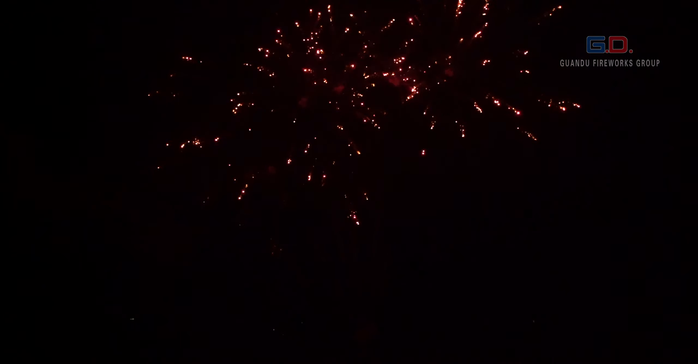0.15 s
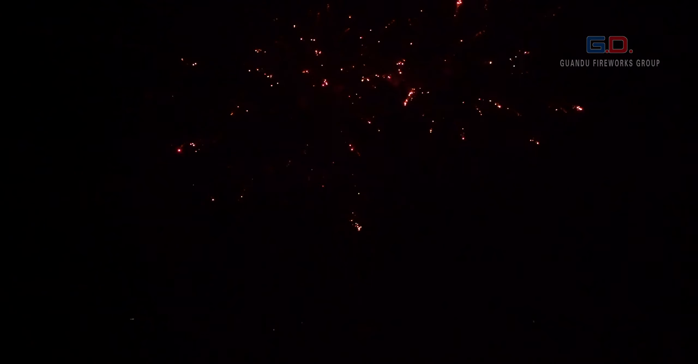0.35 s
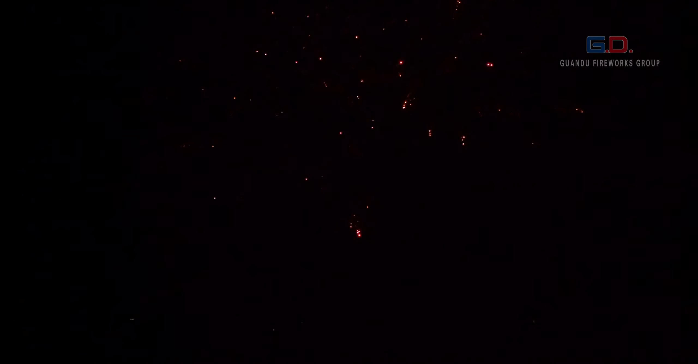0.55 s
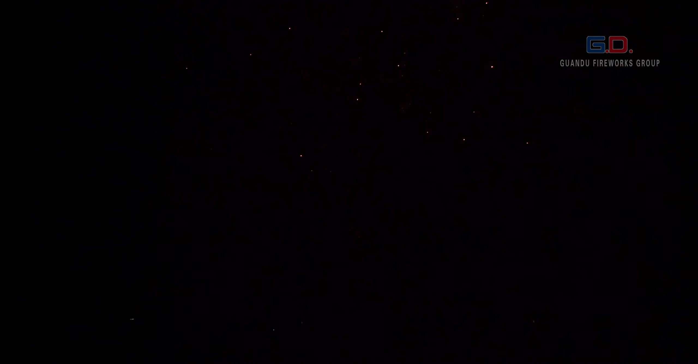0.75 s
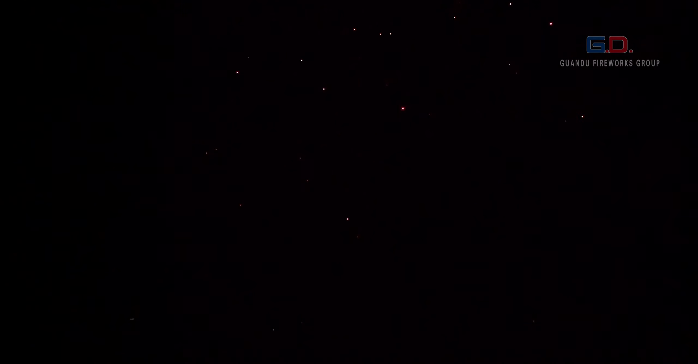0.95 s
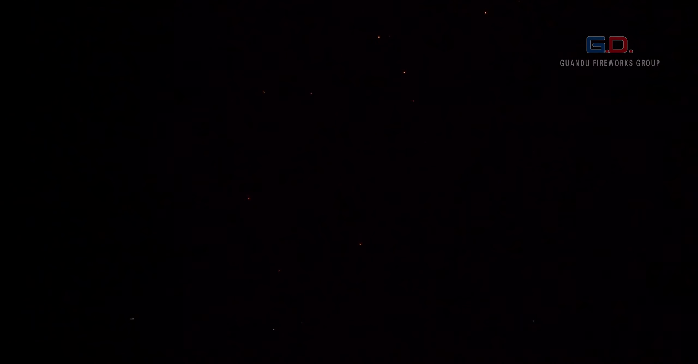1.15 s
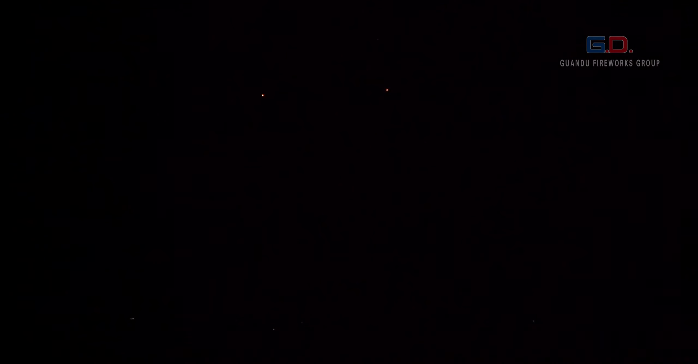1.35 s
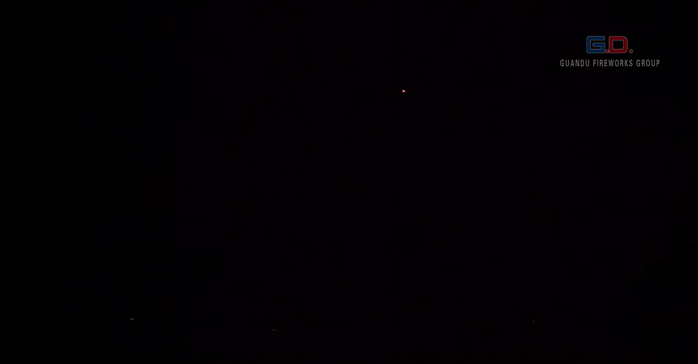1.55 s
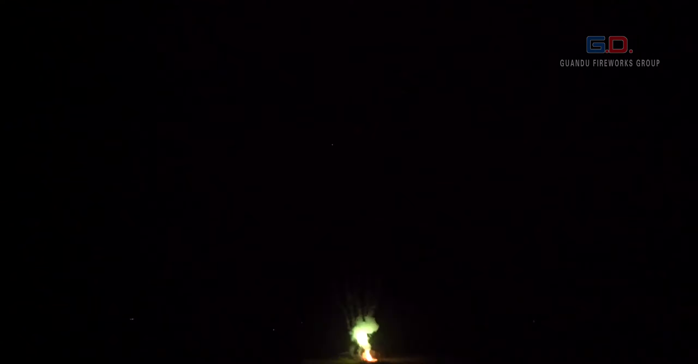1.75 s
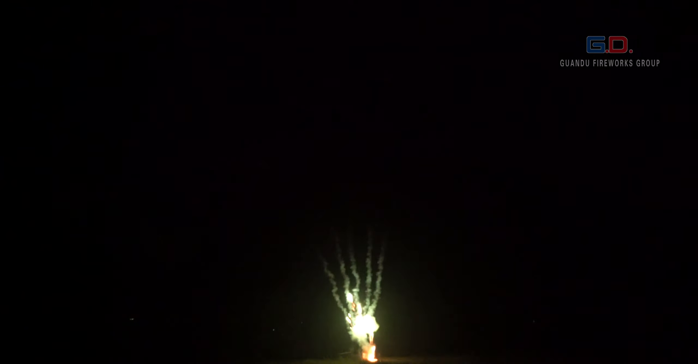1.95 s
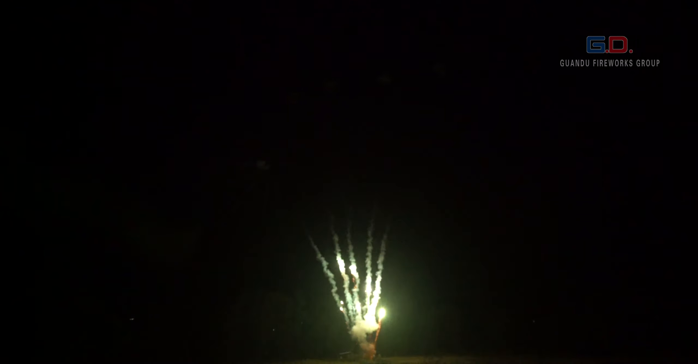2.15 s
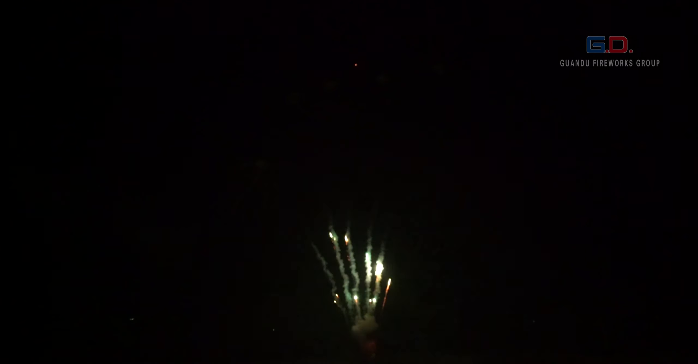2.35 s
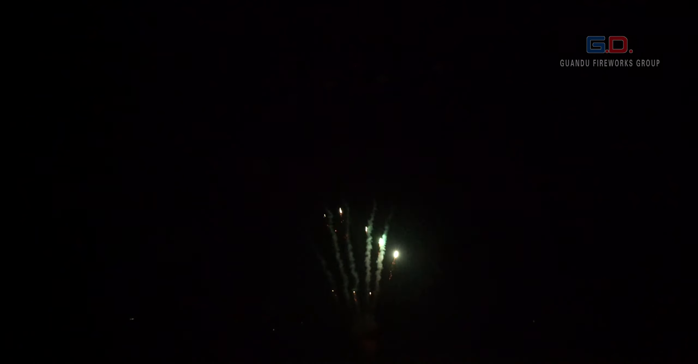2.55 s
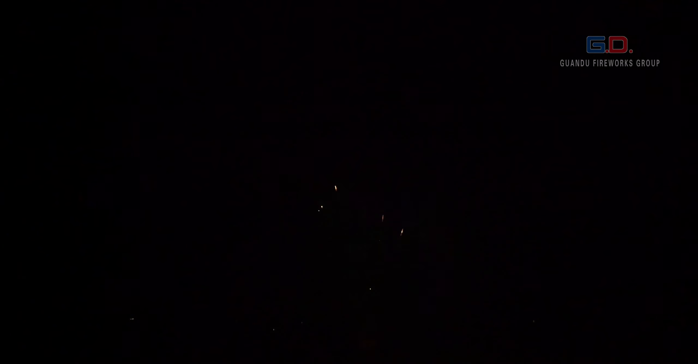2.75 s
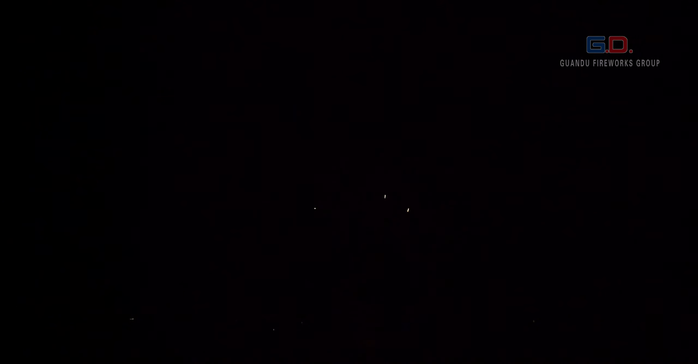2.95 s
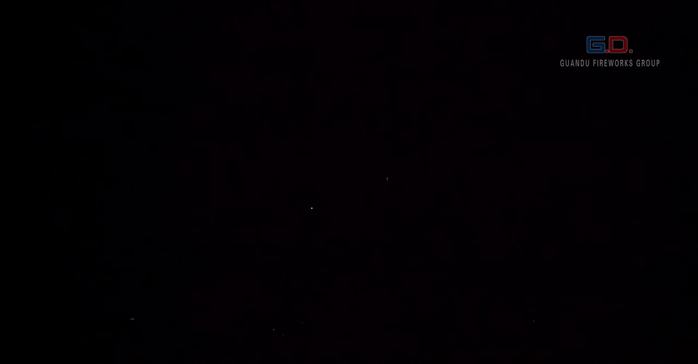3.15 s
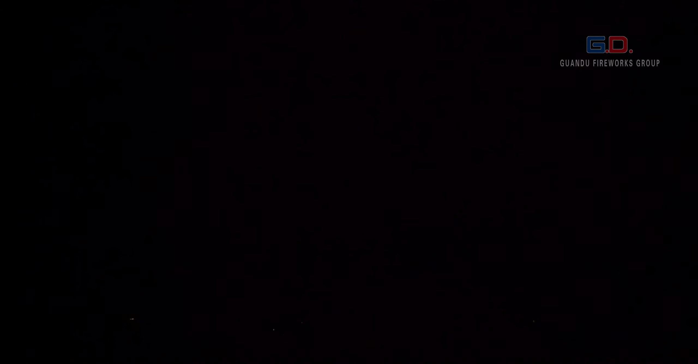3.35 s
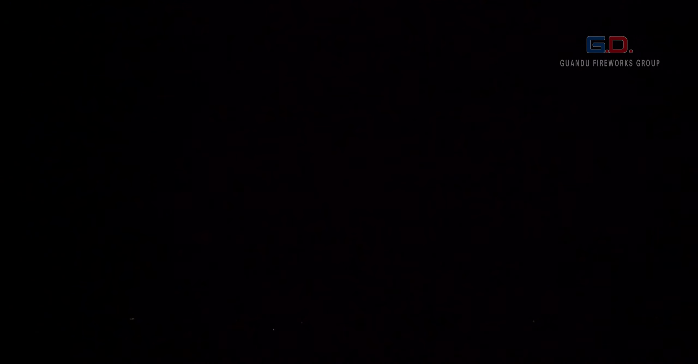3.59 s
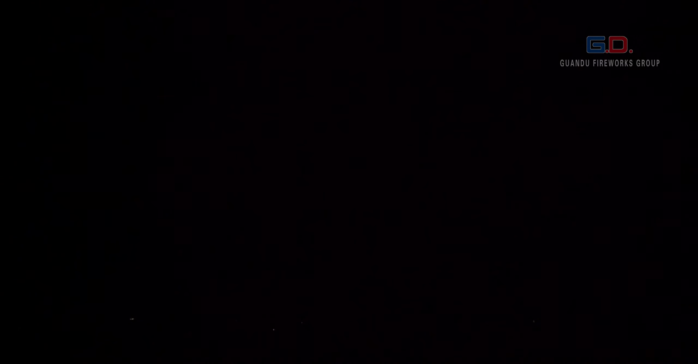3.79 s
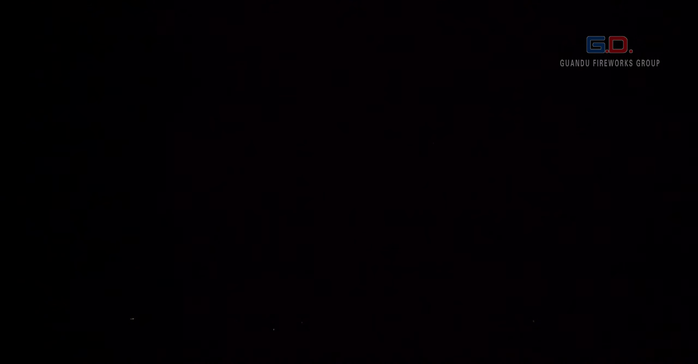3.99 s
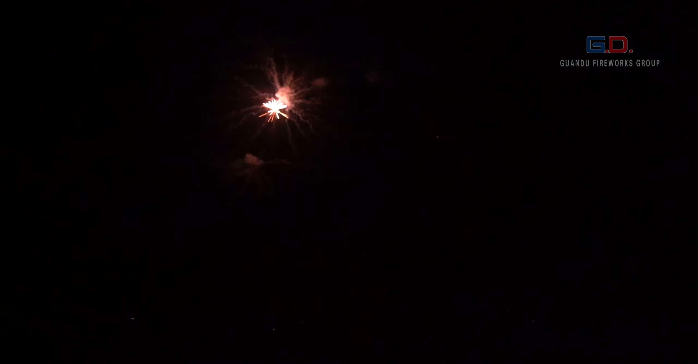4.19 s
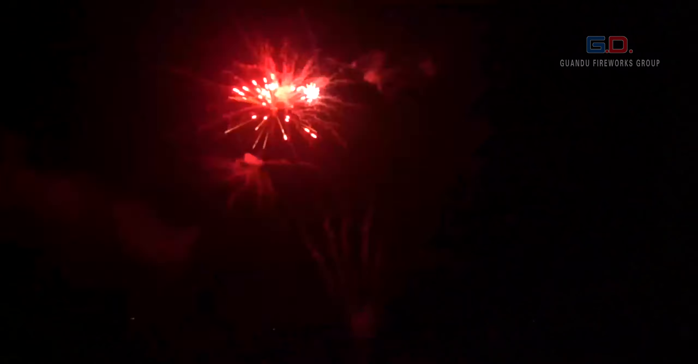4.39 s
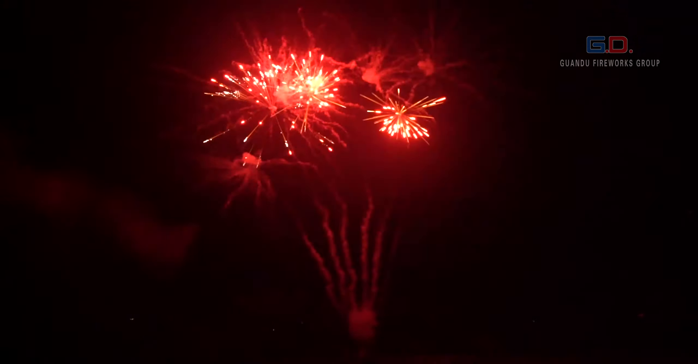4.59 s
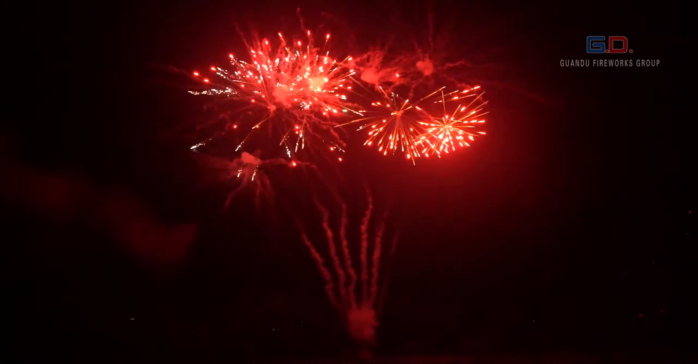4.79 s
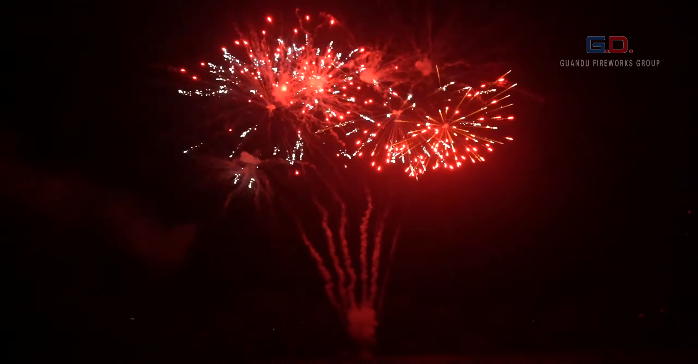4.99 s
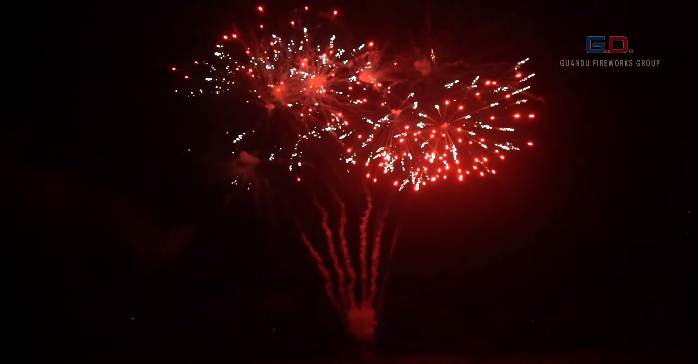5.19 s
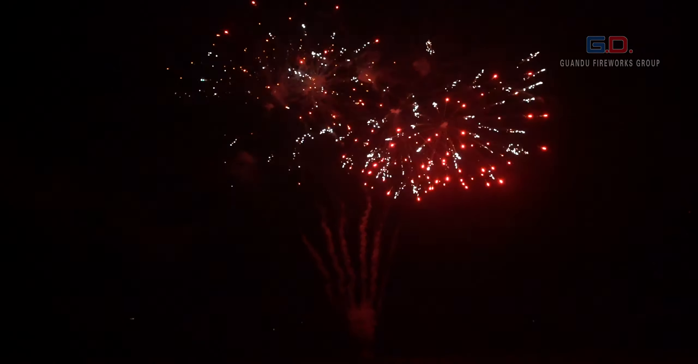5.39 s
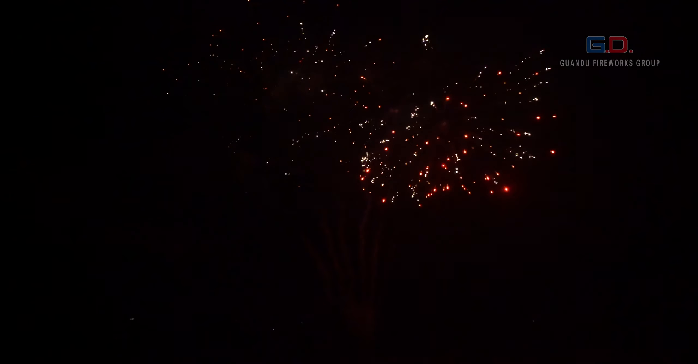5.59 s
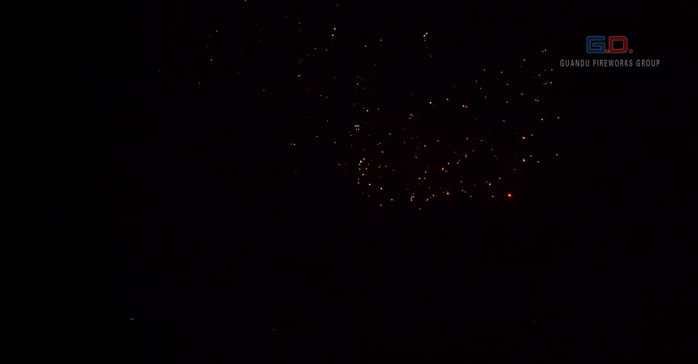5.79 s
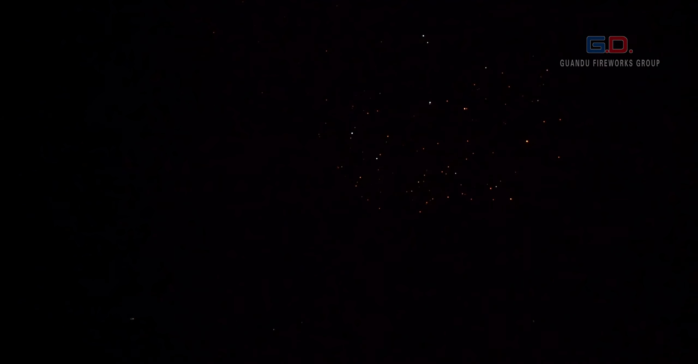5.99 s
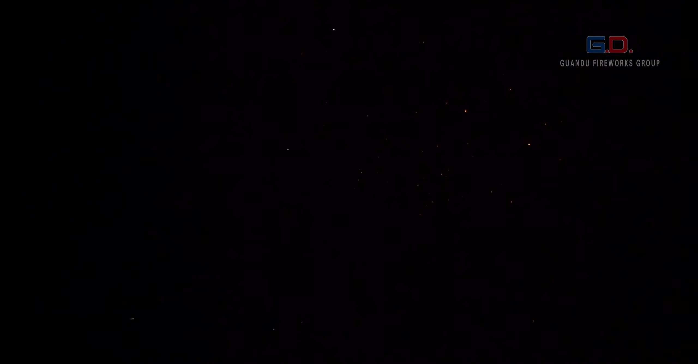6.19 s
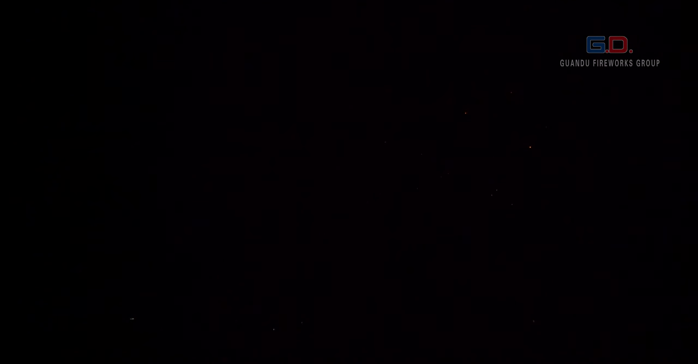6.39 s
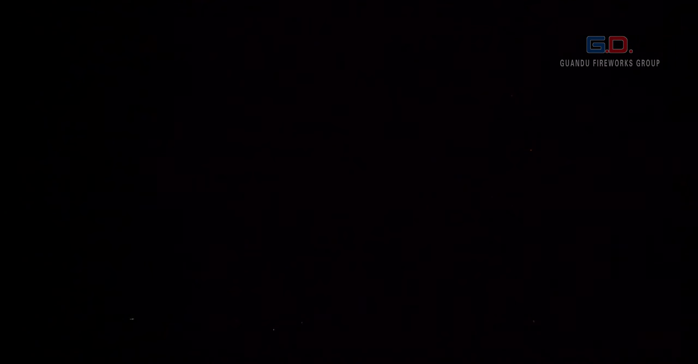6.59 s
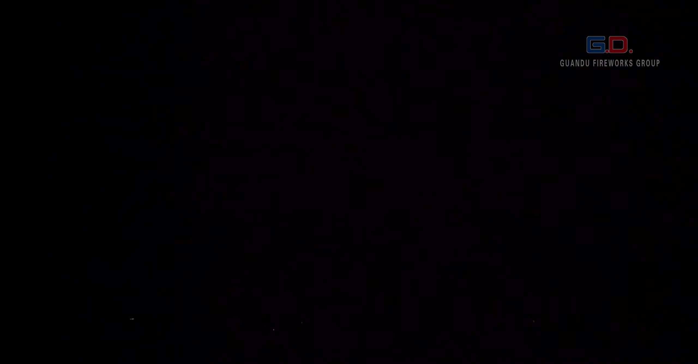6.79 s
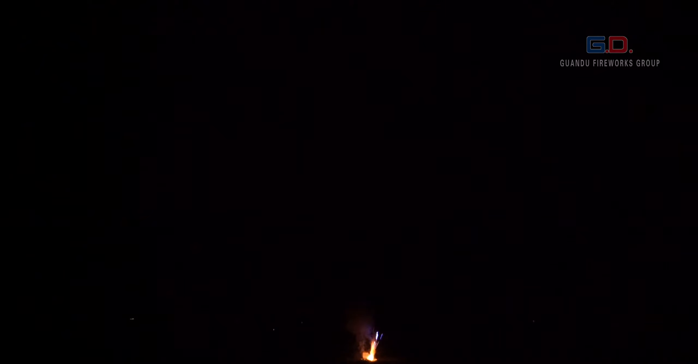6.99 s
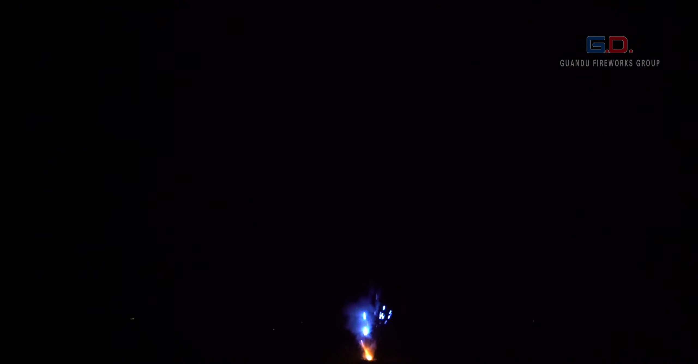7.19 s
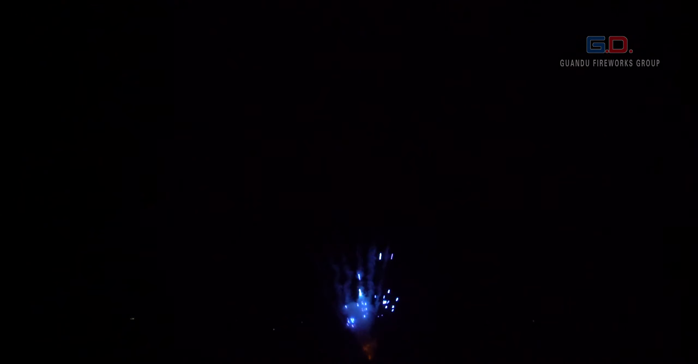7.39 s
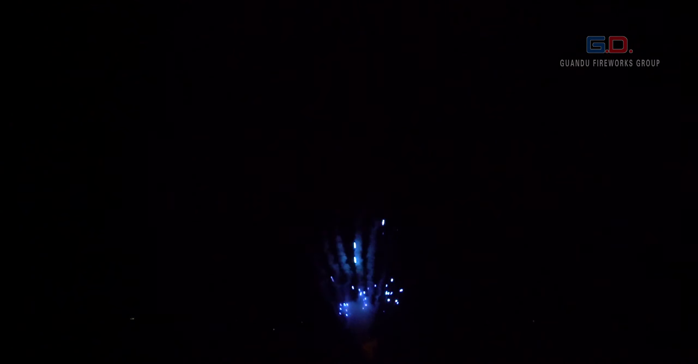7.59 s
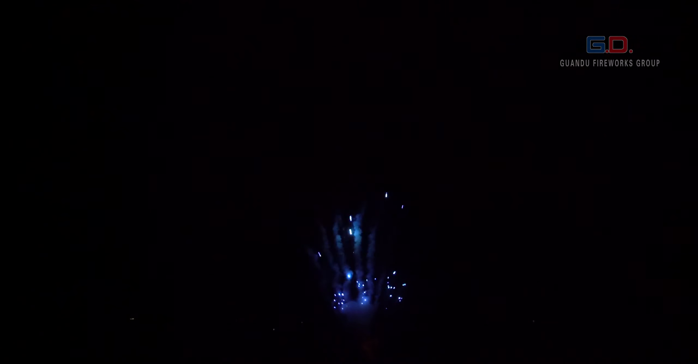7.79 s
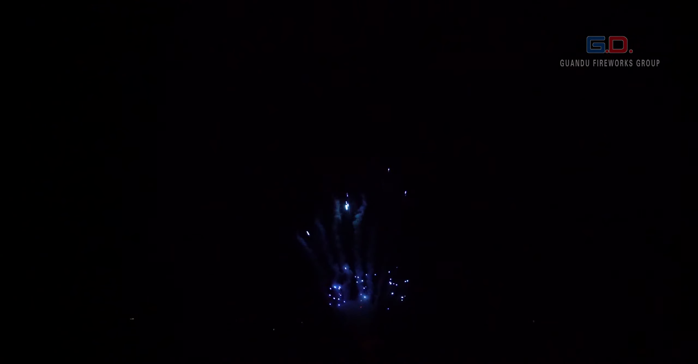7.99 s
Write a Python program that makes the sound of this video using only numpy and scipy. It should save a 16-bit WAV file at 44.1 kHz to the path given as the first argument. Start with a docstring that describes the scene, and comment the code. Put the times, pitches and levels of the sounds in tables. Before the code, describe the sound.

Heard from the edge of an open field, a fireworks cake launches two quick volleys of five cracking, hollow shots. Between the volleys, four shells explode overhead in a tight cluster, the loudest moment, leaving a long rumbling echo. A fading roll and soft sizzle open the scene, and dull faraway fireworks thud before each volley. Very faint crickets and low night air fill the gaps.

```python
"""First the dying roll and sizzle of a shell already open over a night field, with far fireworks
rumbling and thudding and insects singing in the grass. A fireworks cake fires two fans of five shells,
each with a gas jet, a crack and a hollow tube note; between the fans four shells burst overhead.
Nearby walls slap back, the tree line rolls on, and a limiter flattens the bursts."""
import sys
import numpy as np
from scipy import signal
from scipy.fft import rfft, irfft, next_fast_len
from scipy.io import wavfile
from scipy.ndimage import uniform_filter1d, minimum_filter1d, map_coordinates

SR = 44100
rng = np.random.default_rng(int(sys.argv[2]) if len(sys.argv) > 2 else 0)


def file_out(sig):
    """Save sig as 16-bit WAV at sys.argv[1]."""
    # one column per channel
    cols = np.atleast_2d(sig).T
    # limit, then scale
    lim = np.clip(cols, -1, 1)
    pcm = np.round(lim * 32767).astype(np.int16)
    wavfile.write(sys.argv[1], SR, pcm)


N = 355005

# Event levels are relative; each layer adds its own offset.
# overhead shells: start_s, crack_db, roll_db, roll_rise_s, near_scatter_db, far_rumble_db
SHELL_BURSTS = [(-.68, 0, 0, .02, 0, -32.5), (4.5799, 2.5, .3, .016, 2, -42.5),
                (4.7895, 3.5, -1.2, .05, 0.5, -42.5), (4.8533, -4, -12, .02, -9, -42.5),
                (5.0525, 0, -5.8, .012, 3.5, -41.5)]
# cricket: start_s, chirp_count, period_s, level_after_burst_db
CRICKET_BOUTS = [(.45, 3, .338, -62.3), (2.378, 7, .323, -62.5), (5.885, 5, .31, -63)]
# far fireworks: start_s, thud_db, crack_db
FAR_THUDS = [(.636, -37.5, -66), (.715, -32, -48), (.807, -45, -48), (0.882, -36, -49), (.979, -39, -52),
             (1.188, -25, -41), (6.527, -34, -52), (6.609, -31, -43.5), (6.727, -34, -53),
             (6.813, -26.5, -40.5)]
# lift charges: start_s, level_db, thump_db, jet_db, tube_pitch_hz
LIFT_CHARGES = [(2.0673, 2, -0.5, -3.5, 3520), (2.1401, 0, 3, 0, 3600), (2.2018, -1, 1.5, -3, 3250),
                (2.2474, -3.5, 11, -6, 900), (2.3086, -0.5, 0, -8, 1450), (7.292, 2.5, -0.5, -0.5, 2500),
                (7.3462, -0.5, -4, 0, 1500), (7.406, -0.5, 1, -1, 3400), (7.4655, -0.5, -4.5, -1, 2850),
                (7.5205, 2, -11, -2, 3020)]
# wall echoes: delay_s, gain, lowpass_hz
BURST_ECHOES = [(.0082, 0.44, 7000), (0.0115, 0.11, 5000), (0.013, 0.33, 5000), (0.028, -0.45, 900),
                (.046, .55, 2000), (.057, 0.51, 1190)]
LIFT_ECHOES = [(.0069, 0.71, 3000), (.0079, -0.11, 3500), (0.0187, -1.2, 280), (0.0195, .5, 400),
               (.029, -0.61, 300)]
# ring of the tubes and the walled yard: pitch_hz, level_db, t60_s
YARD_MODES = [(64.2, -14, 1.83), (115.1, 3.5, 0.58), (135.5, -5, 0.32), (182.3, 2, 0.44), (259.3, 0, 0.57),
              (294, 6, 0.18), (364, 1, 0.33), (898, -6, .12), (1135, -4, .15), (1432, -12, 0.11),
              (1903, -11, 0.28), (2170, -13, 0.19), (2960, -9.5, 0.13)]
# spectra: freq_hz, density_db
BURST_SPECTRUM = [(20, -38), (48, -25), (110, -1.5), (170, 0), (250, -0.5), (400, -1.5), (700, -8),
                  (1300, -14), (3200, -24), (6600, -31.5), (11000, -31.5)]
BURST_ROLL_SPECTRUM = [(20, -38), (48, -23.5), (80, -11.5), (115, 0.5), (160, -3.3), (245, 2.2),
                       (360, -1.7), (450, -9), (720, -9.5), (950, -17), (1350, -17), (3200, -28),
                       (6600, -29), (11000, -35.5)]
CRACKLE_SPECTRUM = [(100, -11), (800, 2), (2500, 7), (11000, -14)]
STAR_SPECTRUM = [(500, -10), (1500, -6), (3000, -2.5), (7000, -8), (11000, -15.5)]
AIR_SPECTRUM = [(20, -22), (60, -5.5), (130, -1.5), (300, 0.5), (480, -5), (620, -4.5), (850, -13.5),
                (1300, -13.5), (2200, -19.5), (4000, -28.5), (6000, -30), (11000, -41)]
HISS_SPECTRUM = [(900, -34), (2000, 3.5), (2400, -6.5), (3700, -4.5), (4800, -10.5), (5350, -3.5),
                 (5800, -6), (6400, -7.5), (7200, -9), (11000, -16)]
RUMBLE_SPECTRUM = [(20, -28), (55, -21.5), (114, -3.8), (153, -6.8), (199, 1), (330, -1), (490, -16),
                   (600, -11), (850, -21.5), (1050, -19), (2100, -29), (3800, -44.5), (11000, -63)]
CHORUS_SPECTRUM = [(1800, -40), (2500, -6), (2800, 1.5), (3080, 1.5), (3400, -10), (4300, -32)]
GRASS_SPECTRUM = [(1000, 0), (8000, 0)]
FAR_CRACK_SPECTRUM = [(300, -11), (1000, 3.5), (2500, -4), (4500, -19), (8000, -38)]
THUD_SPECTRUM = [(29, -53), (50, -25), (226, 6.5), (476, -9), (562, -17.5), (1000, -20.5), (1310, -35.5),
                 (2250, -39.5), (7000, -59), (9100, -87), (15400, -120)]
JET_SPECTRUM = [(300, -3), (1200, -2.5), (3200, -0.5), (6000, -4), (11000, -12.5)]
LIFT_SPECTRUM = [(20, -16), (45, -7), (120, 10), (270, 6), (500, -3.5), (1100, -3.5), (2000, -11),
                 (3200, -7.5), (6000, -18), (11000, -31)]
LIFT_ROLL_SPECTRUM = [(25, -11), (64, 0), (130, 1), (300, -1), (450, -11.5), (950, -9), (3300, -20.5),
                      (6000, -21.5), (11000, -32.5)]
GROUND_SPECTRUM = [(200, -16), (600, -1.5), (1200, 2), (1800, -6), (3100, -3.5), (4200, -9.5),
                   (6000, -7.5), (11000, -15.5)]
# decay of the scatter: freq_hz, t60_s
BURST_DECAY = [(60, 2.5), (130, 1.56), (250, 1.4), (1000, 1.49), (4000, 1.63), (10000, 1.19)]
LIFT_DECAY = [(60, 1.74), (250, 0.89), (1000, 1.26), (4000, 1.31), (10000, 1.09)]
# left-right likeness of the scatter: freq_hz, coherence
STEREO_COHERENCE = [(60, .97), (250, .95), (500, .8), (1000, .62), (2000, .45), (4500, .27), (11000, .15)]
# phase of reflections: freq_hz, left_lead_rad
STEREO_PHASE = [(30, -.5), (70, -.5), (250, -.8), (500, -.95), (1500, -.7), (3600, -1.25), (7000, -.5)]
# balance of reflections: freq_hz, left_minus_right_db
STEREO_BALANCE = [(60, 0), (170, 0), (490, 1.0), (1380, 3), (3940, 4.5), (11200, 3)]

TOP_HZ = 11150
INSECT_SWELL_DB_PER_S = 2.75
TIME_S = np.arange(N) / SR


def amp(db):
    """Decibels to gain."""
    return 10 ** (np.asarray(db) / 20)


def unit(x):
    """Scale to rms 1."""
    return x / np.sqrt(np.mean(x ** 2) + 1e-20)


def along(points, hz):
    """Read (freq_hz, value) points on a log axis."""
    knots_hz, values = np.transpose(points)
    return np.interp(np.log(hz + 1), np.log(knots_hz + 1), values)


def wobble(rate_hz, size):
    """Smooth random curve."""
    knots = rng.standard_normal(int(size * rate_hz / SR) + 4)
    return map_coordinates(knots, [np.arange(size) * rate_hz / SR])


def filtered(x, response):
    """Apply a complex frequency response."""
    size = x.shape[-1]
    padded = next_fast_len(size + SR // 4)
    return irfft(rfft(x, padded) * response(np.fft.rfftfreq(padded, 1 / SR)), padded)[..., :size]


def add(track, start_s, x):
    """Mix x into the track."""
    i = round(start_s * SR)
    part = x[..., max(-i, 0):N - i]
    track[:, max(i, 0):max(i, 0) + part.shape[-1]] += part


def from_side(x):
    """Reflections reach left and right at different levels and phases."""
    sides = np.array([[.5], [-.5]])
    return filtered(x, lambda hz: amp(sides * along(STEREO_BALANCE, hz))
                    * np.exp(1j * sides * along(STEREO_PHASE, hz)))


def diffuse(spectrum, size):
    """Stereo noise of rms 1, alike in the bass, nearly unrelated in the treble."""
    def mid_side_gains(hz):
        angle = np.arccos(np.clip(along(STEREO_COHERENCE, hz), 0, 1)) / 2
        return amp(along(spectrum, hz)) * [np.cos(angle), np.sin(angle)]
    mid, side = filtered(rng.standard_normal((2, size)), mid_side_gains)
    return unit(from_side(np.array([mid + side, mid - side])))


def shock(spectrum, swing_hz, size=8192):
    """Causal pressure jump of peak 1 that swings back through zero."""
    hz = np.fft.rfftfreq(size, 1 / SR)
    magnitude = amp(along(spectrum, hz)) / (1 + (hz / TOP_HZ) ** 20)
    cepstrum = irfft(np.log(magnitude + 1e-6))
    causal_fold = 1 + np.sign(np.fft.fftfreq(size))
    minimum_phase = np.exp(rfft(cepstrum * causal_fold))
    allpass = (swing_hz - 1j * hz) / (swing_hz + 1j * hz)
    wave = irfft(minimum_phase * allpass)
    return wave / np.abs(wave).max()


def with_walls(wave, echoes, left_lag_s):
    """Direct wave plus dulled wall echoes."""
    direct = filtered(wave, lambda hz: np.exp(-2j * np.pi * hz * np.array([[left_lag_s], [0]])))
    walls = filtered(wave, lambda hz: sum(
        gain * np.exp(-2j * np.pi * hz * delay_s) / (1 + 1j * hz / lowpass_hz)
        for delay_s, gain, lowpass_hz in echoes))
    return direct + from_side(walls)


def snap(width_s, left_lag_s):
    """Steep blast front: a brief swing down and up."""
    u = (np.arange(256) / SR - np.array([[left_lag_s], [0]])) / width_s - 2
    return np.sqrt(2 * np.e) * u * np.exp(-u ** 2)


def crackle(rate_hz, decay_s, size=SR // 2):
    """Sharp, fading returns from branches and fences."""
    t = np.arange(size) / SR
    hits = (rng.random(size) < rate_hz / SR) * rng.standard_normal((2, size)) * np.exp(-t / decay_s)
    return signal.fftconvolve(hits, shock(CRACKLE_SPECTRUM, swing_hz=3000, size=512)[None], axes=1)


def puff(spectrum, t60_s, rise_s, size=SR // 2):
    """Short cloud of scattered sound."""
    t = np.arange(size) / SR
    return diffuse(spectrum, size) * amp(-60 * t / t60_s) * (1 - np.exp(-t / rise_s))


def roll(spectrum, decay, rise_s, lumps_db, size=2 * SR):
    """Scatter from trees and ground: lumpy noise, each band dying at its own rate."""
    hz, t, bands = signal.stft(diffuse(spectrum, size), SR, nperseg=512)
    bands *= amp(-60 * t / along(decay, hz)[:, None])
    tail = signal.istft(bands, SR, nperseg=512)[1][:, :size]
    attack = 1 - np.exp(-np.arange(size) / SR / rise_s)
    return tail * attack * unit(amp(lumps_db * wobble(130.6, size)))


def since_burst_s(t):
    """Time since the latest overhead burst."""
    starts_s = np.array(SHELL_BURSTS)[:, 0]
    return t - starts_s[np.searchsorted(starts_s, t) - 1]


def shell_bursts():
    """High blasts reach the whole tree line, so their roll is long and loud."""
    out = np.zeros((2, N))
    blast = with_walls(shock(BURST_SPECTRUM, swing_hz=1200), BURST_ECHOES, left_lag_s=.00003)
    front = snap(width_s=.00011, left_lag_s=.00003)
    for start_s, crack_db, roll_db, rise_s, near_db, _ in SHELL_BURSTS:
        add(out, start_s - .0002, amp(crack_db - 11) * front)
        add(out, start_s, amp(crack_db - 3.5) * blast)
        add(out, start_s + .008, amp(crack_db - 13) * crackle(rate_hz=220, decay_s=.09))
        add(out, start_s, amp(near_db - 12.5) * puff(BURST_SPECTRUM, t60_s=.34, rise_s=.00095))
        trees = roll(BURST_ROLL_SPECTRUM, BURST_DECAY, rise_s, lumps_db=.4)
        add(out, start_s, amp(roll_db - 10) * trees)
    return out


def burning_stars(start_db=-56, t60_s=1.95):
    """Stars of the shell already open sizzle and die ever faster."""
    level_db = start_db - 60 * (TIME_S / t60_s) ** 2 + 1.6 * wobble(200, N)
    return amp(level_db) * diffuse(STAR_SPECTRUM, N)


def night_air(swell_db_per_s=4.2):
    """Steady air, plus a thin hiss that drops at each burst and swells back."""
    air = amp(-47) * diffuse(AIR_SPECTRUM, N)
    hiss_db = -76.5 + swell_db_per_s * since_burst_s(TIME_S) + .7 * wobble(9.9, N)
    return air + amp(hiss_db) * diffuse(HISS_SPECTRUM, N)


def far_rumble(floor_db=-51, thud_db=-44.7, lift_db=-56.5, fade_db_per_s=7.5):
    """Every report leaves a fading rumble in the landscape; powers add over a floor."""
    reports = [(start_s, rumble_db) for start_s, *_, rumble_db in SHELL_BURSTS]
    reports += [(start_s, thud_db) for start_s, *_ in FAR_THUDS]
    reports += [(start_s, lift_db) for start_s, *_ in LIFT_CHARGES]
    power = amp(floor_db) ** 2
    for start_s, level_db in reports:
        age_s = TIME_S - start_s
        power += (age_s >= 0) * amp(level_db - fade_db_per_s * age_s) ** 2
    flutter = amp(1.06 + 1.07 * wobble(22, N))
    return np.sqrt(power) * flutter * diffuse(RUMBLE_SPECTRUM, N)


def insect_chorus():
    """Far insects: a noise band, faintest just after a burst."""
    return amp(-70.3 + INSECT_SWELL_DB_PER_S * since_burst_s(TIME_S)) * diffuse(CHORUS_SPECTRUM, N)


def cricket(stroke_s=.0395, stroke_period_s=.05):
    """Chirps of three or four wing strokes, each falling in pitch, blurred by grass."""
    song = np.zeros((2, N))
    progress = np.linspace(0, 1, round(stroke_s * SR))
    envelope = np.sin(np.pi * progress) ** .48
    grass = puff(GRASS_SPECTRUM, t60_s=.2, rise_s=.0023)
    for start_s, chirp_count, period_s, level_db in CRICKET_BOUTS:
        for chirp in range(chirp_count):
            chirp_s = start_s + chirp * period_s
            gain = amp(level_db - 2.5 + INSECT_SWELL_DB_PER_S * since_burst_s(chirp_s))
            for stroke in range(4 if chirp % 3 == 2 else 3):
                pitch_hz = (4640 - 500 * progress ** 1.2) * (1 + .035 * wobble(900, len(progress)))
                tone = np.sin(2 * np.pi * np.cumsum(pitch_hz) / SR)
                add(song, chirp_s + stroke * stroke_period_s, gain * envelope * tone)
    blurred = signal.fftconvolve(song, grass / np.linalg.norm(grass[0]), axes=1)[:, :N]
    return .55 * song + .78 * blurred


def far_thuds():
    """Distant fireworks: a faint crack, then a dull boom and its scatter."""
    out = np.zeros((2, N))
    boom = from_side(shock(THUD_SPECTRUM, swing_hz=600))
    for start_s, thud_db, crack_db in FAR_THUDS:
        add(out, start_s, amp(crack_db + 3.3) * puff(FAR_CRACK_SPECTRUM, t60_s=.1, rise_s=.00027))
        add(out, start_s + .004, amp(thud_db + 3) * boom)
        add(out, start_s + .004, amp(thud_db) * puff(THUD_SPECTRUM, t60_s=.14, rise_s=.0013))
    return out


def lift_charges(jet_s=.0076, shelf_hz=456, tube_t60_s=.025):
    """Gas jets past each shell, the tube's mouth cracks, then tube and yard ring."""
    out = np.zeros((2, N))
    t = np.arange(SR) / SR
    blast = with_walls(shock(LIFT_SPECTRUM, swing_hz=2480), LIFT_ECHOES, left_lag_s=.00005)
    front = snap(width_s=.00009, left_lag_s=.00005)
    modes = sum(amp(db - 60 * t / t60_s) * np.sin(2 * np.pi * hz * t) for hz, db, t60_s in YARD_MODES)
    ring = from_side(modes * (1 - np.exp(-t / .0041)))
    # the tubes stand together, so all shots share the same ground paths
    ground = puff(GROUND_SPECTRUM, t60_s=.16, rise_s=.00093)
    jet_swell = np.sin(np.pi * np.linspace(.1, .9, round(jet_s * SR)))
    for start_s, level_db, thump_db, jet_db, tube_pitch_hz in LIFT_CHARGES:
        jet = jet_swell * diffuse(JET_SPECTRUM, 4096)[:, :len(jet_swell)]
        shelved = filtered(blast, lambda hz: 1 + (amp(thump_db) - 1) / (1 + 1j * hz / shelf_hz))
        phase = 2 * np.pi * tube_pitch_hz * t
        tube = (np.sin(phase) + amp(-7) * np.sin(2 * phase)) * amp(-60 * t / tube_t60_s)
        trees = roll(LIFT_ROLL_SPECTRUM, LIFT_DECAY, rise_s=.029, lumps_db=.5, size=SR)
        add(out, start_s - jet_s, amp(level_db + jet_db - 23.5) * jet)
        add(out, start_s - .0002, amp(level_db - 9) * front)
        add(out, start_s, amp(level_db - 7.5) * shelved)
        add(out, start_s, amp(level_db + thump_db / 2 - 28) * ring)
        add(out, start_s, amp(level_db - 24.5) * ground)
        add(out, start_s, amp(level_db - 23) * tube * [[1], [.7]])
        add(out, start_s, amp(level_db - 28) * trees)
    return out


def scene():
    """Everything heard from the edge of the field."""
    fireworks = lift_charges() + shell_bursts() + far_rumble() + far_thuds()
    return fireworks + insect_chorus() + cricket() + burning_stars() + night_air()


def limiter(x, ceiling_db, hold_s):
    """Gain ducks under peaks and returns after a short hold."""
    needed_gain = np.minimum(1, amp(ceiling_db) / (np.abs(x).max(0) + 1e-9))
    size = 2 * round(hold_s * SR / 2) + 1
    held_gain = minimum_filter1d(needed_gain, size, origin=size // 2)
    return x * uniform_filter1d(held_gain, size=24)


def record(dry):
    """Limit the peaks; cut everything above TOP_HZ."""
    return filtered(limiter(dry, ceiling_db=-6.5, hold_s=.0069), lambda hz: hz < TOP_HZ)


dry = scene()
out = record(dry)
file_out(out)
```